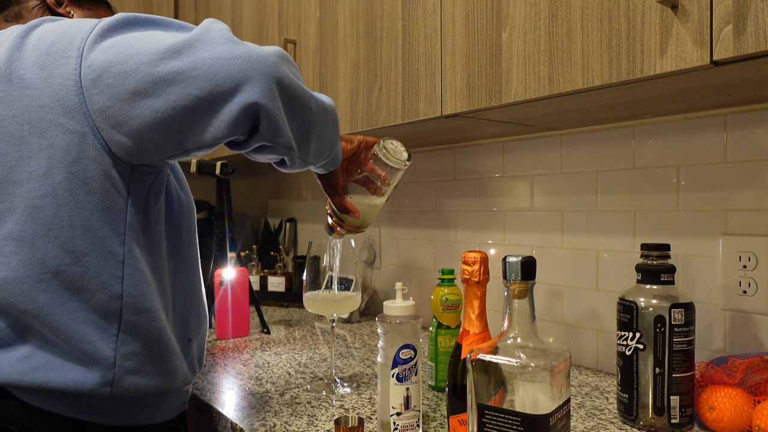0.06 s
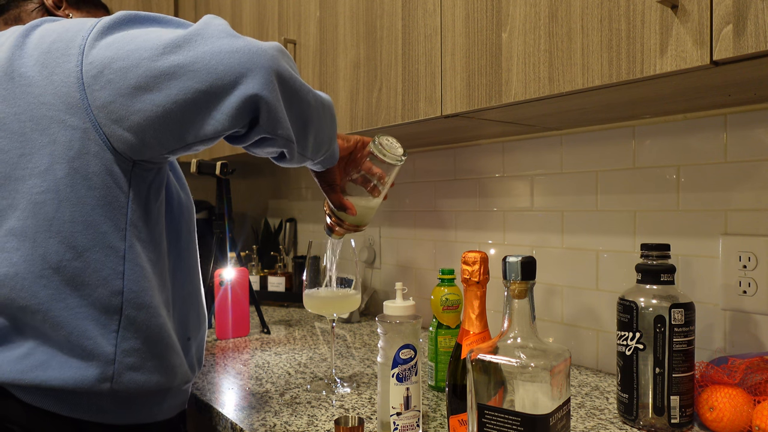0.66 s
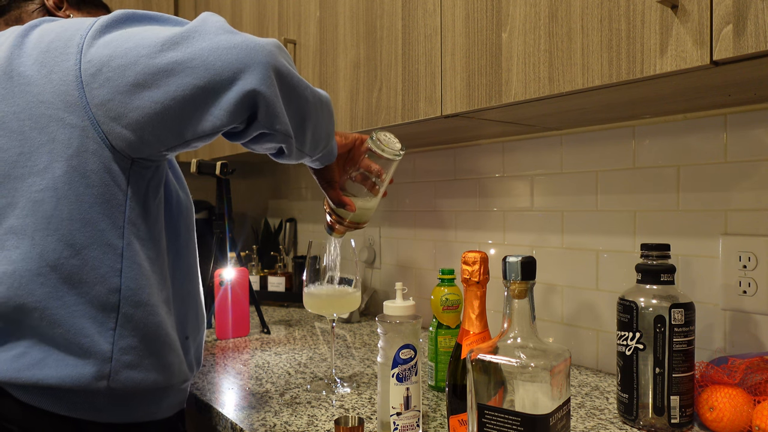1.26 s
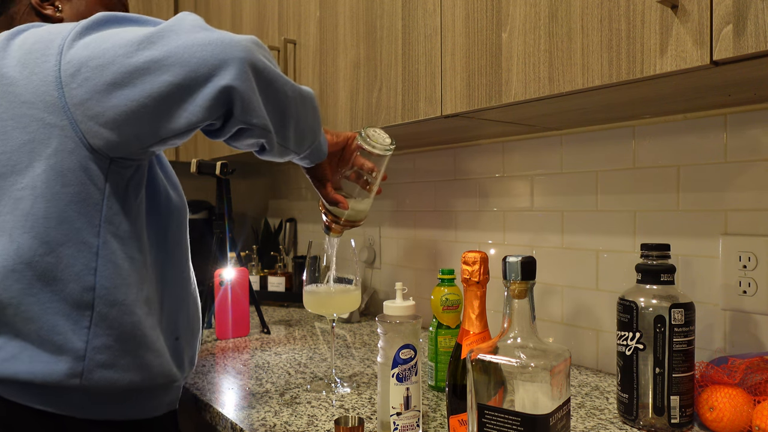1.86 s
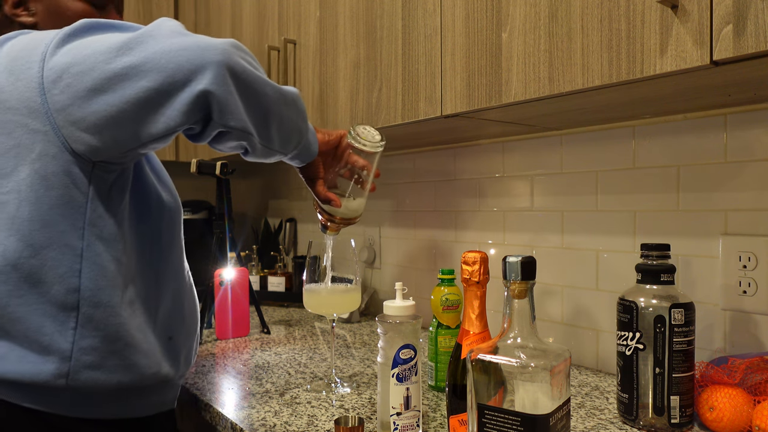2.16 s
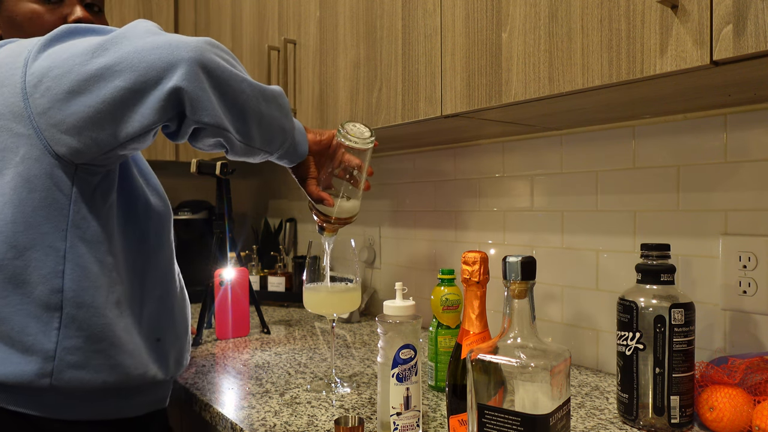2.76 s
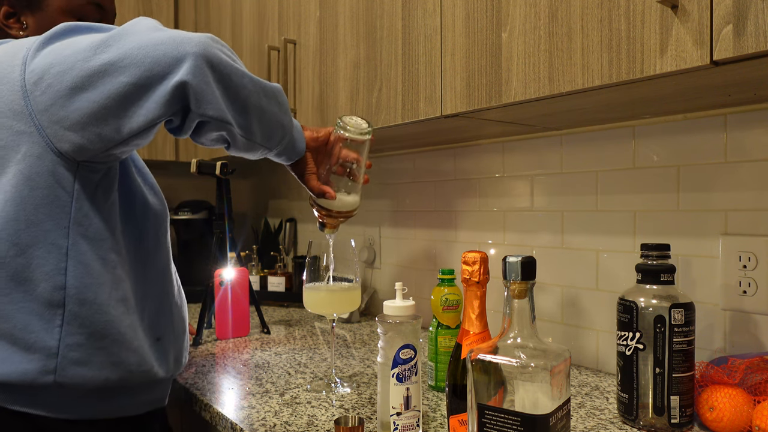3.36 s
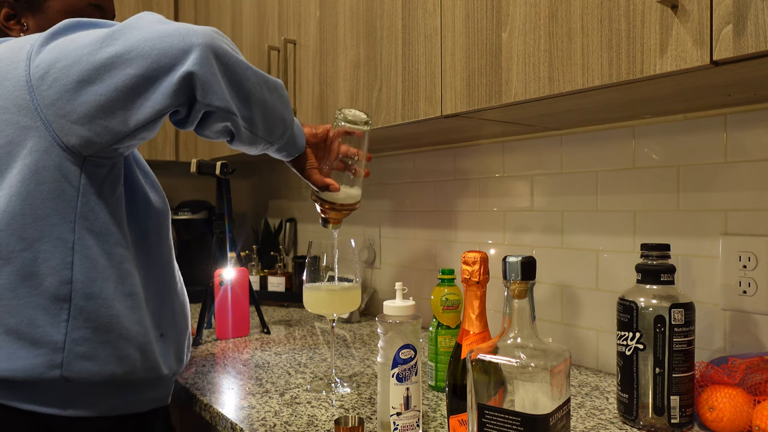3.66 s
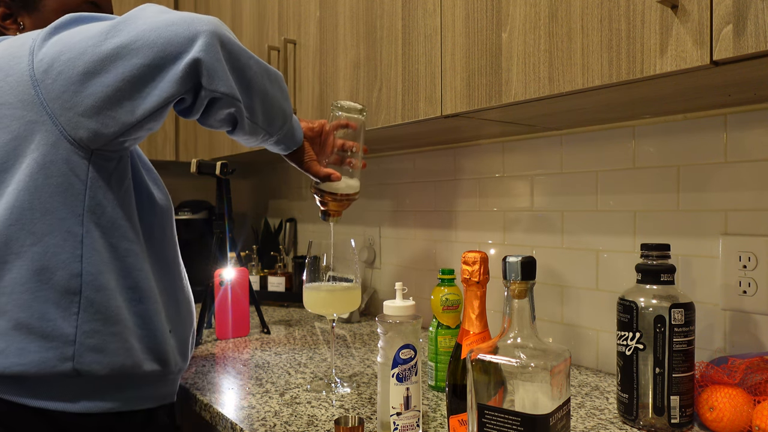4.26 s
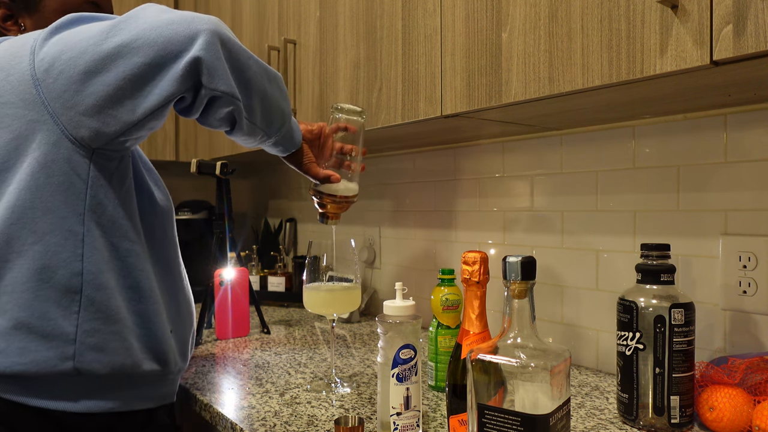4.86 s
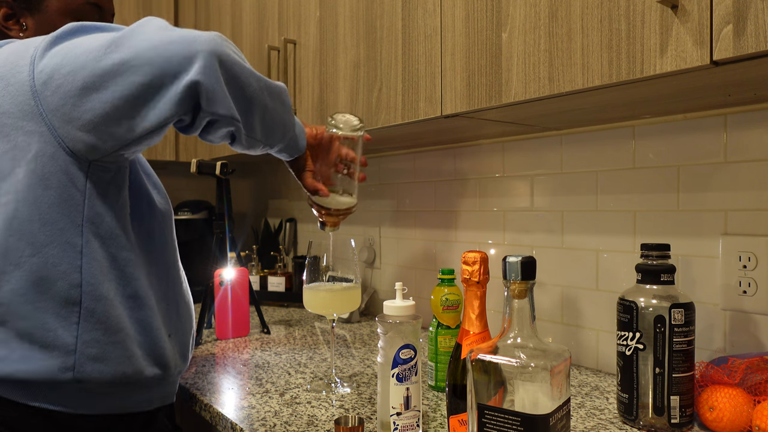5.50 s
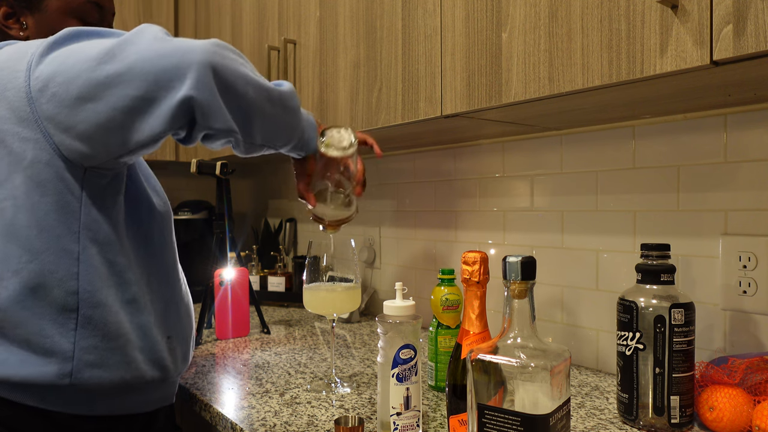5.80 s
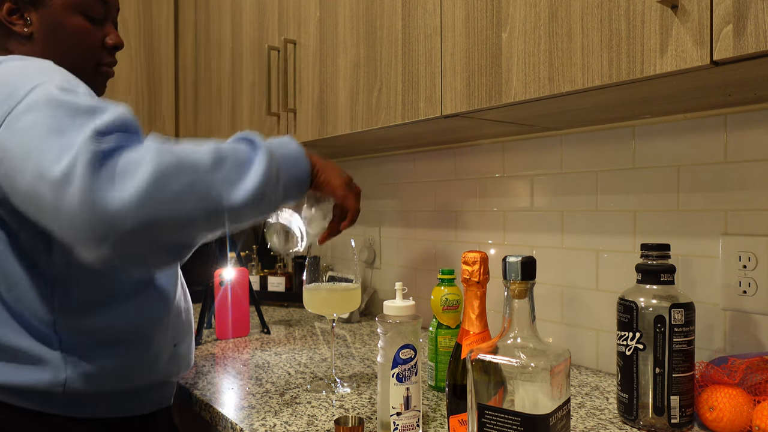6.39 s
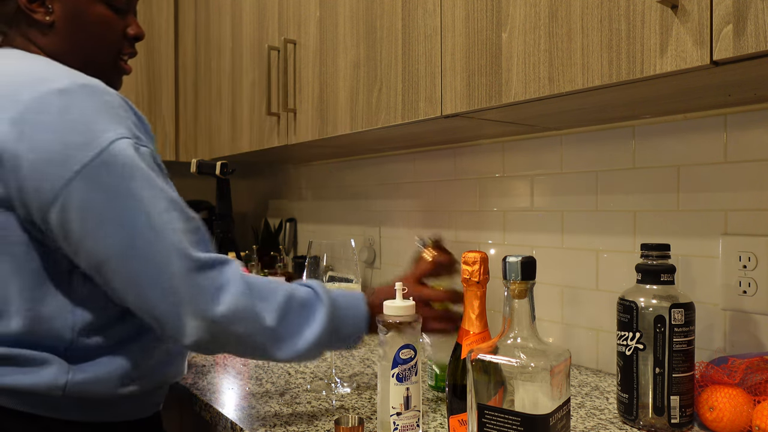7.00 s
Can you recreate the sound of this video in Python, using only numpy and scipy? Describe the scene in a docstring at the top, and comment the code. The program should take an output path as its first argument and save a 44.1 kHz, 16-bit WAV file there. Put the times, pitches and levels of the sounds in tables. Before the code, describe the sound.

A drink pours from a glass jar into a stemmed glass, bubbling and splashing with a hollow note that climbs as it fills. The stream thins to a trickle, small gurgles and soft drips. After a short pause, ice cubes slide down the jar, clacking together and ringing the glass. The stereo microphone is close, in a kitchen with short reflections and a soft fan and appliance hum.

```python
"""Straining a drink over a kitchen counter

Close stereo microphone, the glass near centre, a fan and an appliance humming in the room behind.
A drink runs from a glass jar of ice into a stemmed glass. The jet drives bubbles that ring the air in the
bowl, breaks into splashes, thins and ends in drips. Then the jar is turned upright and the ice slides
and tumbles to its bottom, ringing the wall. Counter, tiles and cabinets throw back short reflections."""
import sys
import numpy as np
from scipy import signal
from scipy.io import wavfile
from scipy.ndimage import uniform_filter1d

SR = 44100
rng = np.random.default_rng(int(sys.argv[2]) if len(sys.argv) > 2 else 0)


def digitize_waveform(pressure):
    """Quantize a signal to 16-bit integers and store it at the path in sys.argv[1].

    Rows of a 2-D input are taken as channels; values are limited to [-1, 1].
    """
    field = np.atleast_2d(pressure).T
    bounded = np.clip(field, -1, 1)
    quanta = np.round(bounded * 32767).astype(np.int16)
    wavfile.write(sys.argv[1], SR, quanta)


N = 310371
TIME = np.arange(N) / SR


def amp(db):
    """Decibels to gain."""
    return 10 ** (np.asarray(db) / 20)


def unit(x):
    """Scales to rms 1."""
    return x / np.sqrt(np.mean(x ** 2) + 1e-20)


def burst(x):
    """Scales a short sound to the energy of 20 ms at rms 1."""
    return x / np.sqrt(np.sum(x ** 2) / (.02 * SR) + 1e-20)


def steady(x, span):
    """Evens out the level over span seconds and keeps the finer grain."""
    power = abs(uniform_filter1d(x ** 2, size=int(span * SR)))
    return x / np.sqrt(power + 1e-4 * np.mean(x ** 2))


def swell(s, hold, rise, fall):
    """A gain that rises to 1 at time s, holds and dies away; slopes in dB/s."""
    return amp(-rise * np.maximum(s - TIME, 0) - fall * np.maximum(TIME - s - hold, 0))


def add(mix, s, sound):
    """Mixes a sound in at time s."""
    part = mix[max(round(s * SR), 0):][:len(sound)]
    part += sound[:len(part)]


def read(points, hz):
    """Reads a curve on a log-frequency axis."""
    f, value = np.transpose(points)
    return np.interp(np.log(hz + 1), np.log(f + 1), value)


def colour(x, points):
    """Minimum-phase filter with the given spectrum."""
    hz = abs(np.fft.fftfreq(4096, 1 / SR))
    log_gain = np.log(amp(np.maximum(read(points, hz), -100)))
    taps = np.fft.ifft(np.exp(np.conj(signal.hilbert(log_gain)))).real[:2048]
    return signal.oaconvolve(x, taps)[:len(x)]


def resonate(x, hz, width_hz):
    """A resonance of gain 1, fixed or moving."""
    turn = np.exp(2j * np.pi * np.cumsum(hz * np.ones(len(x))) / SR)
    pole = np.exp(-np.pi * width_hz / SR)
    return 2 * (turn * signal.lfilter([1 - pole], [1, -pole], x / turn + 1e-18)).real


def ring_modes(x, modes):
    """Drives several resonances side by side."""
    return sum(amp(db) * resonate(x, hz, width) for hz, width, db in modes)


def clicks(per_s, spread_db):
    """Impulses at random times, of random size and sign."""
    size = amp(spread_db * np.minimum(rng.exponential(1, N), 4)) * rng.choice([-1, 1], N)
    return size * (rng.random(N) < per_s / SR)


def bubble(hz, cycles, rise, size):
    """A bubble pinches off within a cycle, rings, and rises in pitch as it nears the surface."""
    turns = np.multiply.outer(hz, np.arange(size) / SR)
    envelope = np.exp(-turns / cycles) * np.minimum(turns, 1)
    glide = 1 + rise * np.minimum(turns / cycles, 6)
    return envelope * np.sin(2 * np.pi * turns * glide)


def swarm(starts, lo_hz, hi_hz, cycles, spread_db, size=N):
    """Bubbles of random pitch and strength, born at the given times."""
    pitch, strength = rng.random((2, len(starts)))
    hz = lo_hz * (min(hi_hz, SR / 2) / lo_hz) ** pitch
    gain = amp(-spread_db * np.log(np.maximum(strength, .02))) * np.sqrt(hz / lo_hz)
    waves = gain[:, None] * bubble(hz, cycles, rise=0.015, size=600)
    at = (starts * SR).astype(int)[:, None] + np.arange(waves.shape[1])
    return np.bincount(at.ravel(), waves.ravel(), size)[:size]


def cloud(life, lo_hz, hi_hz, cycles, count):
    """The shower of bubbles after one impact swells quickly and thins out."""
    starts = life * rng.gamma(2, .5, count)
    return swarm(starts - starts.min(), lo_hz, hi_hz, cycles, spread_db=0.5, size=5000)


# Fan noise in the room: (frequency [Hz], relative level [dB])
FAN_SPECTRUM = [(15, -65), (25, -35), (170, -2.5), (248, -0.5), (299, -1.5), (352, -3.5), (620, -9.5),
                (1090, -15), (1320, -12.5), (2460, -20), (2730, -9), (2970, -22.5), (7420, -29),
                (10300, -26.5), (15800, -31)]
# Appliance hum, centre of the image: (frequency [Hz], rms level [dB])
HUM_LINES = [(76, -82), (120, -79.5), (149.5, -70), (199.2, -66.5), (247.6, -62.5), (298.4, -56),
             (2724, -69.5), (2783, -93)]
# Stereo spread of the room at the microphone: (frequency [Hz], side gain [dB])
ROOM_WIDTH = [(30, 3), (110, -17), (250, -10.5), (600, -13.5), (1300, -9), (2400, -12), (4400, -6.5),
              (8100, -7), (15000, -19.5)]


def room_tone():
    """Behind everything, soft fan noise and the wavering hum of an appliance, as mid and side."""
    mid, side = (amp(-57) * unit(colour(rng.standard_normal(N), FAN_SPECTRUM)) for _ in range(2))
    for hz, db in HUM_LINES:
        waver = unit(resonate(rng.standard_normal(N), hz, width_hz=5 + hz / 110))
        mid += amp(db) * unit(np.sin(2 * np.pi * hz * TIME) + (0.29 + hz / 3000) * waver)
    return np.array([mid, amp(6) * colour(side, ROOM_WIDTH)])


# Reverberation of the kitchen: (frequency [Hz], t60 [s])
KITCHEN_DECAY = [(200, 0.21), (700, 0.87), (2000, 0.46), (5000, 0.61), (10000, 0.35), (16000, 0.44)]


def room_tail():
    """Sparse reflections follow the direct sound after 4 ms, each band dying at its own speed."""
    taps = rng.choice([-1., 1.], SR) * (rng.random(SR) < 4000 / SR) * (TIME[:SR] > .004)
    hz, t, bands = signal.stft(taps, SR, nperseg=256)
    early = 1 + amp(10.5) * np.exp(-t / 0.0057)  # counter, tiles and cabinets answer first
    decay = amp(-60 * t / read(KITCHEN_DECAY, hz)[:, None])
    tail = signal.istft(bands * early * decay, SR, nperseg=256)[1]
    return tail / np.linalg.norm(tail)


def kitchen(x, width, wet_db, side_db, pan):
    """A close source and its reflections at the microphone, as mid and side; pan above 0 is left."""
    near, across = (signal.oaconvolve(x, room_tail())[:N] for _ in range(2))
    mid = x + amp(wet_db) * near
    return np.array([mid, pan * mid + amp(side_db) * colour(across, width)])


# Low and high modes of the hand-held jar: (frequency [Hz], spread [Hz], level [dB], t60 [s])
JAR_MODES = [(4840, 18, -32, 0.051), (5390, 34, -8.5, 0.13), (5250, 23, -8, 0.058), (5470, 22, -5.5, 0.073),
             (5380, 234, -3, 0.019)]
JAR_HIGH_MODES = [(8660, 147, 4, 0.11), (9950, 200, -4.5, 0.095), (11020, 220, 1, 0.08),
                  (12200, 560, -1.5, 0.069), (14000, 300, -15, .04), (15500, 230, -14, .04)]


def jar_wall(x, groups):
    """Blows ring the glass wall of the jar, each resonance split into many close modes."""
    t, ring = TIME[:SR // 5], 0
    for hz, spread_hz, db, t60 in groups:
        modes = hz + spread_hz * rng.standard_normal((24, 1))
        beating = np.sin(2 * np.pi * (modes * t + rng.random(modes.shape))).sum(0)
        ring = ring + amp(db) * burst(beating * amp(-60 * t / t60))
    return signal.oaconvolve(x, ring)[:len(x)]


def contact(chatter_s, chatter_db):
    """One sharp blow and the brief chatter that follows it."""
    t = TIME[:SR // 4]
    chatter = burst(rng.standard_normal(len(t)) ** 3 * np.exp(-t / chatter_s))
    return burst(1. * (t == 0)) + amp(chatter_db) * chatter


# Cube on cube (clack) and cube on glass (crack): (frequency [Hz], gain [dB])
CLACK_SPECTRUM = [(200, -13.5), (600, -25), (850, -26), (1100, -14.5), (1500, -4), (2250, 1), (3000, -6),
                  (3900, -15), (5500, -44), (8000, -41), (15000, -53)]
CRACK_SPECTRUM = [(200, -55), (500, -31), (950, -9), (1500, -8.5), (3000, -7), (4200, 2), (6000, -6.5),
                  (7500, -8.5), (11000, -16.5), (15000, -28)]
# Cubes striking, relative levels: (time [s], clack [dB], crack [dB], wall ring [dB])
ICE_HITS = [(6.1, -43.5, -81, -75), (6.125, -40.5, -77, -63), (6.2211, -33, -63, -46),
            (6.2404, -31.5, -60, -46), (6.2576, -42, -44.5, -43), (6.2944, -22, -39, -49),
            (6.3531, -25, -48, -56), (6.4489, -25.5, -42, -48), (6.4571, -24, -39.5, -50),
            (6.494, -20, -29, -23), (6.5143, -18.5, -38, -32), (6.559, -15, -53, -22.5),
            (6.5955, -18.5, -53, -29), (6.6111, -37, -25.5, -32), (6.6189, -18.5, -21, -22),
            (6.6268, -23, -19.5, -12), (6.6483, -18, -29.5, -15), (6.6702, -14.5, -26.5, -18),
            (6.7006, -16.5, -33, -23.5), (6.7308, -28, -29.5, -26.5), (6.7558, -20.5, -39, -29),
            (6.784, -22, -40, -23), (6.8321, -23.5, -32, -31)]
# Stereo spread of the ice's reflections: (frequency [Hz], side gain [dB])
ICE_SPREAD = [(60, -8), (130, -11), (290, -10), (640, -14), (1410, -16), (3100, -11), (6820, -6.5),
              (15000, -16)]
SLIP_S, LAND_S, JOSTLE_S = 6.063, 6.62, .15  # the ice lets go, lands and jostles for a moment
SETTLE_DB_PER_S, GRIP_DB_PER_S = 163, 16


def ice():
    """Close by, cubes slide down the jar, clack on each other and crash on the glass."""
    speed = np.clip((TIME - SLIP_S) / (LAND_S - SLIP_S), 0, 1)
    sliding = speed ** 1.13 * swell(LAND_S, JOSTLE_S, rise=0, fall=SETTLE_DB_PER_S)
    heap = swell(LAND_S, JOSTLE_S, rise=94, fall=SETTLE_DB_PER_S)
    rubbing = steady(colour(clicks(per_s=2000, spread_db=1.5), CLACK_SPECTRUM), span=0.016)
    jostling = clicks(per_s=1800, spread_db=5)
    wall = amp(-35.5) * steady(jar_wall(jostling, JAR_MODES), span=0.026)
    crunch = amp(-37) * steady(colour(jostling, CRACK_SPECTRUM), span=0.047)
    shimmer = amp(-66) * steady(jar_wall(jostling, JAR_HIGH_MODES), span=0.033)
    out = amp(-39) * rubbing * sliding + (wall + crunch + shimmer) * heap
    for s, clack_db, crack_db, ring_db in ICE_HITS:
        grip_db = GRIP_DB_PER_S * max(LAND_S - s, 0)  # the hand damps blows near the neck most
        glancing_db = 22 * (s < LAND_S)  # glancing blows wake less of the high ring
        clack = colour(contact(chatter_s=0.0034, chatter_db=7.5), CLACK_SPECTRUM)
        crack = colour(contact(chatter_s=0.018, chatter_db=7), CRACK_SPECTRUM)
        ring = jar_wall(contact(chatter_s=0.0039, chatter_db=-4), JAR_MODES)
        high_ring = jar_wall(contact(chatter_s=0.0069, chatter_db=-4), JAR_HIGH_MODES)
        add(out, s, amp(clack_db - 13.5) * burst(clack))
        add(out, s, amp(crack_db - 4) * burst(crack))
        add(out, s, amp(ring_db - 7.5 - grip_db) * burst(ring))
        add(out, s, amp(ring_db - 11.5 - glancing_db) * burst(high_ring))
    return out


# Last spurts at the jar's neck, relative levels:
# (time [s], length [s], gurgle [dB], starting pitch [Hz], dribble [dB])
LAST_SPURTS = [(3.595, 0.057, -50.5, 760, -83), (3.812, 0.075, -46.5, 776, -54.5),
               (3.931, 0.035, -35.5, 800, -80), (5.148, 0.094, -54.5, 795, -59.5)]
GURGLE_GLIDE_HZ_PER_S, GURGLE_FALL_DB_PER_S, DRIBBLE_RISE_DB_PER_S = 880, 136, 106


def gurgles():
    """Small gulps of air ring the neck, whose pitch climbs as it drains."""
    out = np.zeros(N)
    for s, length, db, hz, _ in LAST_SPURTS:
        pitch = hz + GURGLE_GLIDE_HZ_PER_S * np.clip(TIME - s, 0, .18)
        gulps = resonate(clicks(per_s=370, spread_db=5.5), pitch, width_hz=180)
        neck = steady(resonate(gulps, pitch, width_hz=940), span=0.054)
        out += amp(db - 4.5) * neck * swell(s, length, rise=600, fall=GURGLE_FALL_DB_PER_S)
    return out


def mist():
    """Tiny droplets crackle on the surface under the jet and its last spurts; stray bubbles ping."""
    droplets = unit(swarm(rng.uniform(0, 4.4, 900), 8430, 16700, cycles=6, spread_db=7))
    pings = unit(swarm(rng.uniform(0, 4.3, 150), 2800, 11300, cycles=35, spread_db=1))
    spurts = sum(amp(db) * swell(s, length, DRIBBLE_RISE_DB_PER_S, GURGLE_FALL_DB_PER_S)
                 for s, length, db, _, _ in LAST_SPURTS)
    lingering = flow() ** 0.6  # the finest droplets thin out more slowly than the jet
    return droplets * (amp(-38) * lingering + amp(-20) * spurts) + amp(-16.5) * pings * flow()


def trickle():
    """A dwindling thread of liquid and the last dribbles patter down and make the glass sing faintly."""
    thread = swell(1.5, hold=0, rise=57, fall=5)
    spurts = sum(amp(db) * swell(s, length, DRIBBLE_RISE_DB_PER_S, fall=51)
                 for s, length, _, _, db in LAST_SPURTS)
    singing = steady(ring_modes(clicks(per_s=120, spread_db=-6), GOBLET_MODES), span=0.116)
    bubbles = swarm(rng.uniform(1.6, 5.6, 3000), 1346, 3330, cycles=8.7, spread_db=5)
    dribble = amp(-2) * steady(bubbles, span=0.048) * spurts
    return singing * (amp(-58) * thread + amp(-13.5) * spurts) + dribble


# Thin wall of the stemmed glass: (frequency [Hz], width [Hz], gain [dB])
GOBLET_MODES = [(2200, 69, -34), (3380, 300, 2.5), (4380, 110, 1), (5480, 56, 5.5), (6560, 210, 0),
                (7760, 320, -6), (10400, 160, -1.5)]


def goblet(x):
    """Drops and bubbles set the thin wall ringing a little."""
    return x + amp(-9) * ring_modes(x, GOBLET_MODES)


# Air in the bowl, above its hollow note: (frequency [Hz], width [Hz], gain [dB])
BOWL_MODES = [(977, 120, -14.5), (1560, 370, -21.5), (2160, 210, 10.5), (2613, 80, 5.5), (3565, 240, 0),
              (3860, 30, -9.5), (4130, 41, 3), (5380, 74, -55), (6060, 170, 12.5)]


def bowl(x, direct_db):
    """Sound from the surface reaches the microphone directly and through the air modes of the bowl."""
    return amp(direct_db) * x + ring_modes(x, BOWL_MODES)


# Single drops into the glass, relative levels: (time [s], plop [dB], pitch [Hz], spray [dB])
DROPS = [(3.5867, -37, 1226, -58), (3.6085, -35, 1253, -64), (3.893, -25, 2200, -46.5),
         (3.978, -36, 2580, -64), (4.129, -35.5, 1220, -57), (4.2727, -37.5, 1530, -59),
         (4.3428, -34.5, 2280, -69), (4.4188, -43, 2230, -53), (4.4505, -32, 1540, -55.5),
         (4.5908, -38.5, 1290, -60), (4.793, -34.5, 1794, -55), (4.9029, -38, 2580, -57),
         (5.0467, -41.5, 2870, -54), (5.087, -41, 1750, -55), (5.1637, -38, 1900, -52),
         (5.5953, -43, 2000, -64)]


def drips():
    """A drop plops softly on the surface and traps a few short-lived bubbles."""
    out = np.zeros(N)
    soften = signal.butter(3, [800, 3000], "band", fs=SR, output="sos")
    for s, db, hz, spray_db in DROPS:
        plop = amp(db - 4) * bubble(hz, cycles=8.9, rise=0.0062, size=5000)
        plop += amp(db - 16) * burst(cloud(0.015, 1234, 3150, cycles=5, count=20))
        add(out, s, signal.sosfilt(soften, plop))
        add(out, s, amp(spray_db - 7.5) * burst(cloud(.007, 2960, 14600, cycles=2.7, count=40)))
    return out


# Large pockets of air driven under: (time [s], relative level [dB], pitch [Hz])
AIR_POCKETS = [(0.028, -27.5, 553), (0.062, -30.5, 590), (0.158, -27, 602), (0.25, -29, 553),
               (0.305, -26, 590), (0.32, -35, 540), (0.416, -29, 590), (0.531, -30, 603), (0.693, -29, 591),
               (0.748, -32, 532), (0.797, -30, 611), (0.891, -29.5, 497), (1.028, -21, 608),
               (1.043, -25, 593), (1.234, -32, 606), (1.487, -30, 625), (1.782, -28.5, 613),
               (1.81, -32, 437), (1.925, -39.5, 377), (1.961, -22.5, 617), (2.715, -38.5, 716),
               (2.96, -39, 694), (3.59, -38.5, 760)]
DEEP_HZ = 418  # the large bubbles that a deeper drink can hold


def glugs():
    """Each air pocket pushes, rings at its own pitch and stirs the liquid; a deeper drink also gulps."""
    out = np.zeros(N)
    times, _, deep_db = np.transpose(FILL_BALANCE)
    for s, db, hz in AIR_POCKETS:
        push = amp(-4) * bubble(hz, cycles=3.1, rise=0.0023, size=5000)
        note = amp(-3) * bubble(hz, cycles=12, rise=0.0011, size=5000)
        stir = amp(-15.5) * burst(cloud(0.022, 513, 636, cycles=12, count=8))
        gulp_db = np.interp(s, times, deep_db) - 12.5
        gulp = amp(gulp_db) * bubble(DEEP_HZ, cycles=21, rise=0.011, size=5000)
        add(out, s, amp(db) * (push + note + stir + gulp))
    return out


# Slugs of liquid hitting the surface, relative levels:
# (time [s], main bubble [dB], its pitch [Hz], shower [dB], spray [dB])
SLUGS = [(0.1619, -26.5, 3900, -39.5, -41), (0.234, -24, 1930, -48, -64), (0.4179, -26.5, 2090, -41, -42.5),
         (0.4928, -27, 2000, -58, -43), (0.5273, -26, 1560, -43, -40.5), (0.6524, -32, 2120, -39, -49),
         (0.7761, -24, 2070, -36, -35.5), (0.8194, -31, 1560, -49, -34), (0.8914, -24.5, 1430, -34, -33),
         (1.0037, -23.5, 2160, -42, -41), (1.0264, -38, 1020, -42, -40.5), (1.05, -32, 1476, -35, -41),
         (1.089, -39, 2190, -35, -39), (1.1467, -21.5, 3820, -37, -42), (1.1864, -23.5, 1560, -37, -65),
         (1.2299, -22, 2940, -35.5, -36.5), (1.2527, -22, 1560, -37, -38), (1.3481, -28, 3700, -33, -38),
         (1.3793, -45, 2200, -29.5, -33), (1.3934, -26, 4300, -45, -39), (1.4917, -25, 1974, -29.5, -49),
         (1.5702, -32, 2060, -34, -54), (1.5969, -17.5, 2990, -31, -37), (1.6896, -29, 1460, -36.5, -36),
         (1.7111, -23.5, 2760, -37.5, -37), (1.7577, -21, 2080, -43, -66), (1.8295, -24.5, 2330, -32, -52),
         (1.9657, -16.5, 2460, -30.5, -38), (2.029, -30, 3530, -44.5, -42), (2.146, -24, 2110, -40, -37),
         (2.1517, -18, 5130, -41, -55), (2.3146, -30, 2200, -52, -48.5), (2.3859, -29, 5350, -46, -48),
         (2.4935, -26, 2540, -45.5, -50), (2.7116, -38, 1260, -46, -48), (2.852, -40, 1100, -52, -43),
         (2.961, -37.5, 1100, -44.5, -53), (3.008, -48, 2280, -57, -48), (3.0852, -41, 2200, -58, -58),
         (3.245, -38, 2540, -46, -50.5), (3.5012, -32, 2260, -46, -55), (3.8337, -32, 2520, -42, -46)]


def splashes():
    """Each slug leaves a main bubble, a shower of smaller ones, a slower wake, a ping and spray."""
    out = np.zeros(N)
    for s, db, hz, shower_db, spray_db in SLUGS:
        ping = bubble(rng.uniform(4280, 9970), cycles=20.4, rise=0.024, size=2000)
        shower = bowl(cloud(.01, 932, 5350, cycles=5.6, count=40), direct_db=-1)
        wake = bowl(cloud(0.029, 1197, 5110, cycles=8.7, count=30), direct_db=1)
        spray = colour(cloud(.008, 4500, 14300, cycles=1.4, count=50), STREAM_SPECTRUM)
        add(out, s + 0.00195, amp(db - 2.5) * bubble(hz, cycles=5.5, rise=0.0098, size=2000))
        add(out, s, amp(shower_db - 7.5) * burst(shower))
        add(out, s, amp(shower_db - 10) * burst(wake))
        add(out, s + 0.0026, amp(spray_db - 12) * burst(ping))
        add(out, s, amp(spray_db - 7) * burst(spray))
    return out


# Strength of the jet: (time [s], level [dB])
JET_LEVEL = [(0.0, -42.5), (0.41, -43), (0.75, -40.5), (1.21, -41.5), (1.63, -40.5), (2.07, -43),
             (2.47, -52.5), (2.89, -49), (3.29, -56.5), (3.97, -53), (4.1, -70)]
BREAK_OFF_DB_PER_S = 156


def flow():
    """Gain of the jet, which thins and breaks off after the last point."""
    s, db = np.transpose(JET_LEVEL)
    return amp(np.interp(TIME, s, db) - BREAK_OFF_DB_PER_S * np.maximum(TIME - s[-1], 0))


# The hollow note climbs as the glass fills: (time [s], pitch [Hz])
HOLLOW_PITCH = [(0, 555), (.7, 570), (1.2, 556), (1.9, 657), (2.7, 696), (3.6, 720)]
# It gives way to deep bubbling, relative levels: (time [s], hollow note [dB], deep bubbling [dB])
FILL_BALANCE = [(0.25, 4, -23), (1.0, -4, -23), (1.4, -5, -6.5), (1.9, -9.5, 2), (2.6, -7.5, 1),
                (3.3, -13, -1)]
# Tone of the bubbles and spray from close by: (frequency [Hz], gain [dB])
STREAM_SPECTRUM = [(470, -59), (800, -26), (952, 5), (1120, -1.5), (1520, 7.5), (1660, 1), (2160, 3),
                   (2440, 4.5), (3050, 5.5), (4000, -3), (5200, -10.5), (10000, -8.5), (15500, -14.5)]


def stream():
    """In front of the microphone, the jet churns up a hollow note, deep bubbling, bubbles and spray."""
    pitch = np.interp(TIME, *np.transpose(HOLLOW_PITCH))
    s, hollow_db, deep_db = np.transpose(FILL_BALANCE)
    churn = resonate(clicks(per_s=420, spread_db=-1), pitch, width_hz=68)
    hollow = steady(resonate(churn, pitch, width_hz=180), span=0.025)
    hollow *= amp(np.interp(TIME, s, hollow_db))
    large_bubbles = resonate(clicks(per_s=360, spread_db=0.5), DEEP_HZ, width_hz=81)
    deep = steady(resonate(large_bubbles, 430, width_hz=1300), span=0.075)
    deep *= amp(np.interp(TIME, s, deep_db))
    bubbles = swarm(rng.uniform(0, 4.3, 6000), 739, 6590, cycles=7.9, spread_db=6.5)
    bubbles = steady(colour(bowl(bubbles, direct_db=-7.5), STREAM_SPECTRUM), span=0.021)
    spray = swarm(rng.uniform(0, 4.3, 8000), 4300, 15500, cycles=6, spread_db=4)
    spray = steady(colour(spray, STREAM_SPECTRUM), span=0.021)
    return flow() * (amp(-1.5) * hollow + amp(-7) * deep + amp(-6.5) * bubbles + amp(-12) * spray)


def scene():
    """At the counter, in stereo: the pour at centre, the ice just to its right, the room all around."""
    low_cut = signal.butter(3, 270, "high", fs=SR, output="sos")  # the pour and the ice carry little below 270 Hz
    liquid = goblet(stream() + glugs() + splashes() + drips()) + mist() + trickle() + gurgles()
    pour = kitchen(signal.sosfilt(low_cut, liquid), ROOM_WIDTH, wet_db=-3.5, side_db=-1, pan=0.0056)
    cubes = kitchen(signal.sosfilt(low_cut, ice()), ICE_SPREAD, wet_db=-5, side_db=0, pan=-0.045)
    mid, side = pour + cubes + room_tone()
    return np.array([mid + side, mid - side])


def record(dry):
    """The recorder's band limit, just under 16 kHz."""
    low_pass = signal.firwin(511, 15950, window=("kaiser", 9), fs=SR)
    return signal.oaconvolve(dry, low_pass[None], "same")


dry = scene()
out = record(dry)
digitize_waveform(out)
```